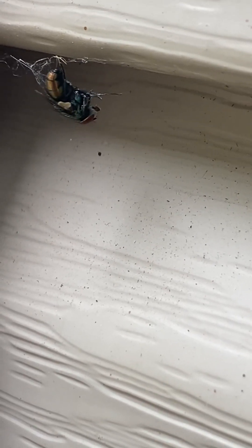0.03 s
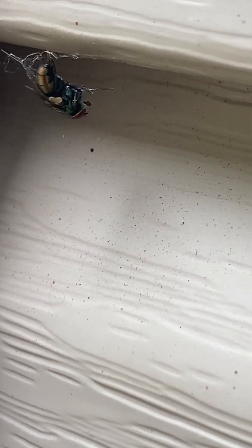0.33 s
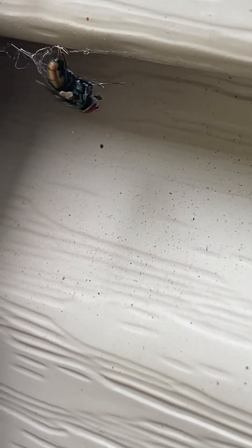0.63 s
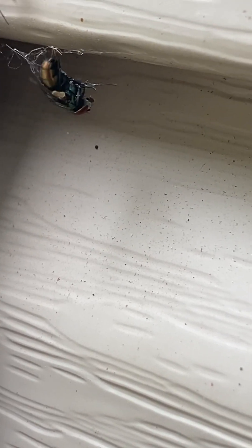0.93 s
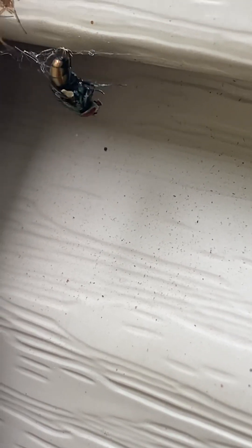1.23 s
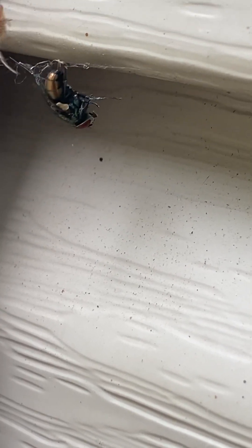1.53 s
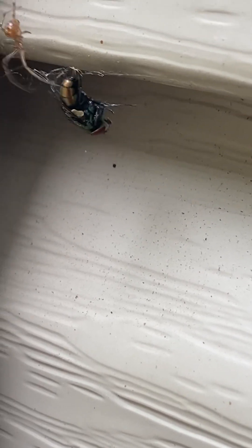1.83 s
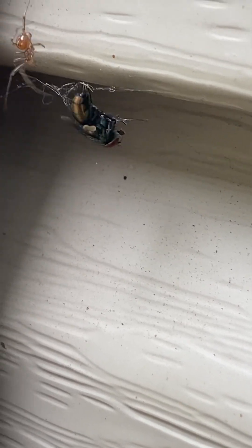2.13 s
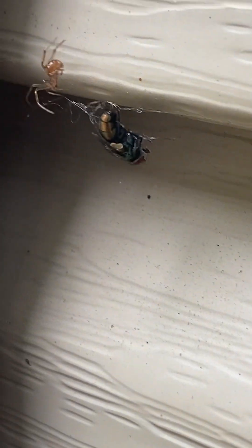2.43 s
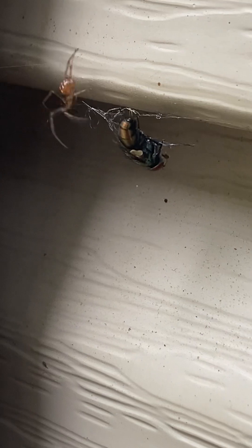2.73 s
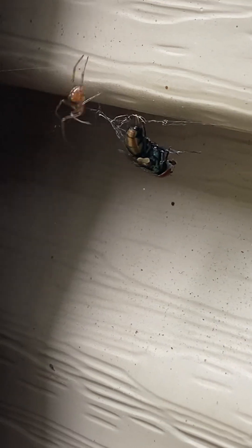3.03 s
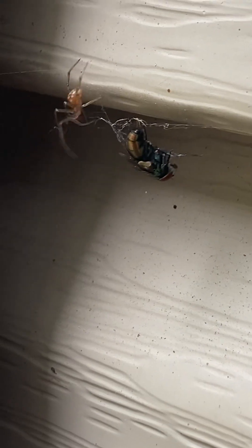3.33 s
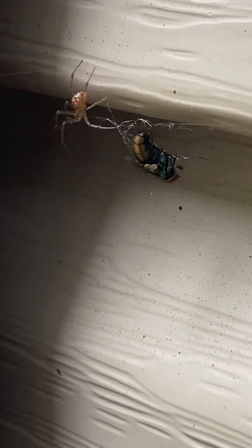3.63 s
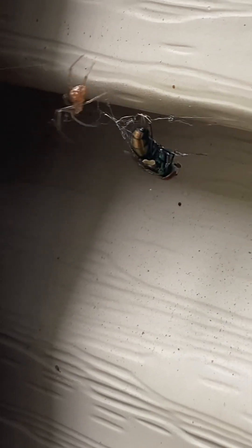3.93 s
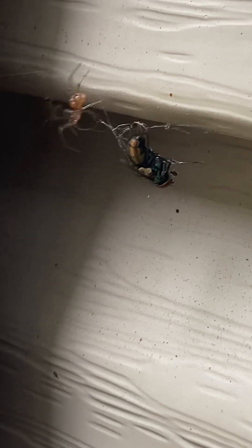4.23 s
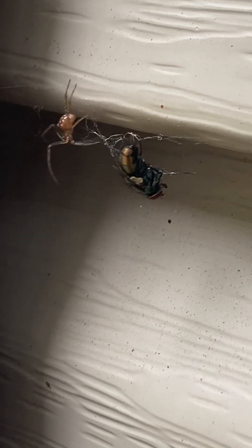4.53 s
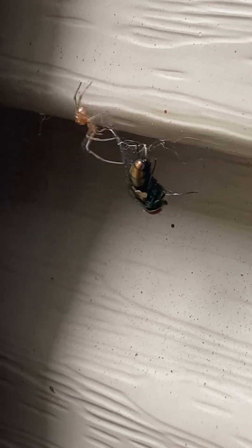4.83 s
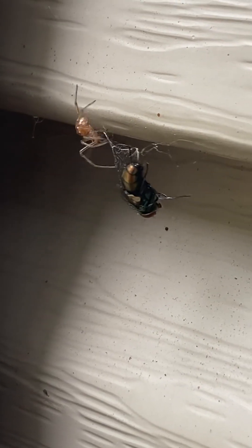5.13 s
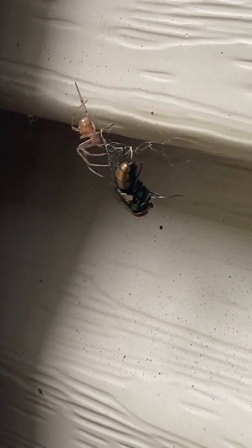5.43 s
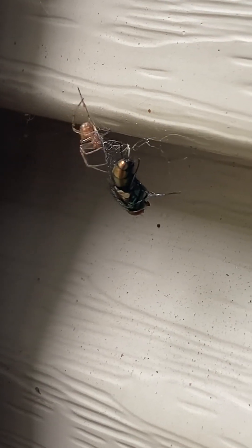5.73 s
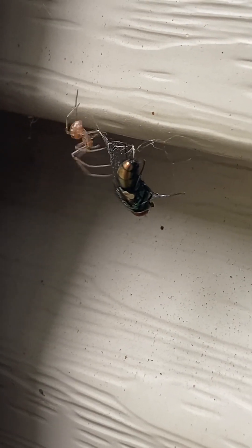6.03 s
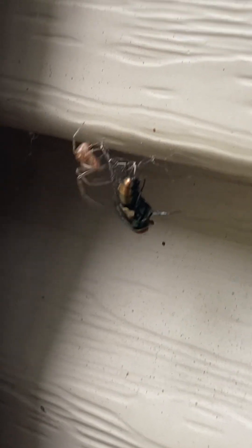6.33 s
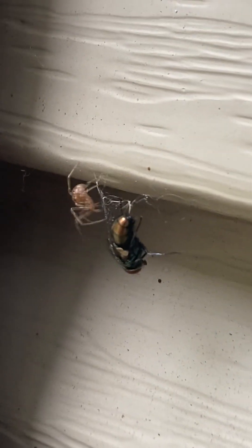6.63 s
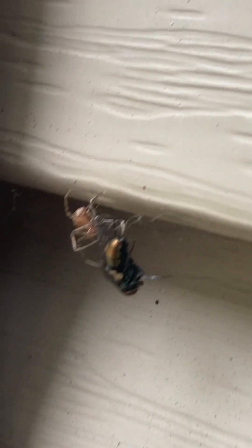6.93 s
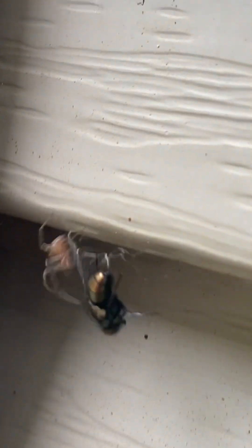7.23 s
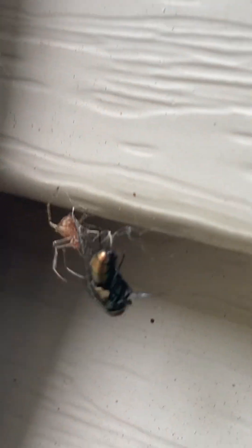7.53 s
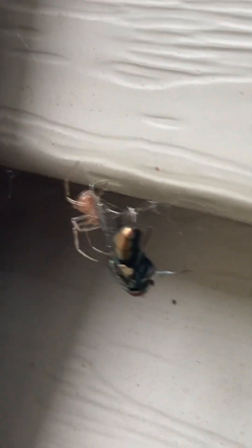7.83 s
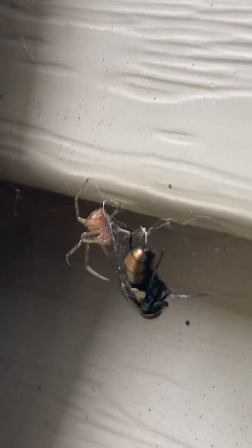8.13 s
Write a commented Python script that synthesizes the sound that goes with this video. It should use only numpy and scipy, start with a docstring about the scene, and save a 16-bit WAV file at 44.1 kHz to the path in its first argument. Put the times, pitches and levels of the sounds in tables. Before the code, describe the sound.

A deep, burbling exhaust and tyre noise swell as a vehicle passes, then fade off throttle, with faint rustling near the end.

```python
"""Eight-cylinder drive-by

A vehicle with a lumpy engine passes a house, heard on two ports of a phone close to the siding.
Its exhaust drones, sinks into a pipe resonance, booms and goes off throttle. Tyres, a high hiss and
brief whines come and go over far traffic. Late on, the hand or sleeve on the phone rustles faintly."""
import sys
import numpy as np
from scipy import signal
from scipy.fft import rfft, irfft
from scipy.io import wavfile
from scipy.ndimage import uniform_filter1d

SR = 44100
rng = np.random.default_rng(int(sys.argv[2]) if len(sys.argv) > 2 else 0)


def file_out(sig):
    """Save sig as 16-bit WAV at sys.argv[1]."""
    # one column per channel
    cols = np.atleast_2d(sig).T
    # limit, then scale
    lim = np.clip(cols, -1, 1)
    pcm = np.round(lim * 32767).astype(np.int16)
    wavfile.write(sys.argv[1], SR, pcm)


N = 365148
T = np.arange(N) / SR
FREQ_HZ = np.maximum(np.arange(N // 2 + 1) * SR / N, 1)

# Noise colours. Each row: frequency in Hz, relative level in dB.
TRAFFIC_COLOUR = [(20, -15.5), (45, 7), (110, 10.5), (250, 1), (450, -29), (600, -32.5), (850, -32.5),
                  (1600, -34), (2500, -19), (4000, -45.5), (8000, -42), (15000, -56.5)]
CLOTH_COLOUR = [(1500, -10), (3800, 5), (6000, 2), (8000, -2), (10500, 1), (14000, -3), (16000, -8)]
TREAD_COLOUR = [(350, -3.5), (520, -12.5), (700, -9), (960, -9), (1130, -3.5), (1600, -3), (2120, -4.5),
                (2280, -7.5), (2450, -5), (3000, -8), (3500, -10), (4300, -12.5), (5800, -19), (12000, -54)]
FIRING_COLOUR = [(20, -40.5), (40, -7.5), (60, -5), (110, 3.5), (170, -3), (260, -1.1), (380, 0), (470, 4),
                 (560, -14.5), (700, -11), (900, -33), (2500, -100)]
# High hiss. Each row: frequency in Hz, relative level in dB.
HIGH_HISS_COLOUR = [(2500, -17), (4200, -13.5), (5400, 1), (7000, -1), (10000, 0), (11500, -16),
                    (14000, -12.5), (15500, -19)]
# Slides of hand or sleeve. Each row: centre in seconds, half length in seconds, level in dB.
RUSTLES = [(6.68, .07, -66), (6.76, .05, -69), (6.843, .02, -66), (6.92, .09, -70.5), (7.055, .06, -70.5),
           (7.16, .07, -70), (7.235, .025, -68.5), (7.285, .035, -69), (7.4, .7, -76), (7.51, .065, -70),
           (7.625, .055, -70.5), (7.81, .05, -73), (7.99, .035, -69), (8.085, .035, -70.5)]
# Whines and swells of pitched noise.
# Each row: centre and half length in seconds, pitch and half width in Hz, level in dB.
PITCHED_SWELLS = [(.75, .3, 580, 32, -57), (2.75, .62, 1380, 20, -54), (2.72, .13, 1440, 110, -49),
                  (2.85, .45, 1850, 360, -51), (3.17, .13, 1775, 45, -53), (3.1, 1.1, 616, 24, -57),
                  (3.17, .09, 1440, 130, -50.5), (3.45, .17, 1520, 38, -55), (3.45, .3, 1210, 45, -55),
                  (3.55, .65, 1120, 40, -54), (4.003, .58, 426, 15, -47), (4.16, .58, 2400, 890, -52.5),
                  (4.1, .25, 2130, 60, -58), (4.25, .04, 1765, 50, -51), (4.6, .35, 1900, 230, -53.5),
                  (4.8, .4, 1760, 50, -54), (4.5, .5, 1470, 70, -56), (4.35, .25, 705, 45, -54),
                  (4.93, .2, 815, 75, -49), (5.1, .25, 1105, 34, -56), (5.286, .13, 1590, 348, -52),
                  (5.6, .35, 518, 38, -57.5), (6.814, 1, 856, 150, -65)]
# Engine speed. Each row: time in seconds, firing rate of one cylinder bank in Hz.
BANK_RATE = [(0, 80.94), (.5, 84.8), (.72, 89.5), (1.05, 82), (1.22, 74.7), (2.8, 74.7), (3.6, 74.9),
             (4.5, 74.2), (4.85, 73), (5.32, 71.6), (5.7, 60.5), (6.12, 54.8), (6.76, 58.5), (7.15, 58.6),
             (7.52, 59.2), (7.7, 47), (8.28, 42)]
# Rough exhaust. Each row: time in seconds, relative burble and rasp levels in dB.
ROUGH_LEVELS = [(0, -50.5, -54), (.9, -45.5, -51), (1.6, -49, -52.5), (2.2, -48, -50.5),
                (2.8, -43.5, -48.5), (3.55, -43.5, -44.5), (4.1, -42, -42), (5.22, -50, -43),
                (5.5, -43, -46.5), (6.05, -45, -50), (6.5, -41.5, -53), (7.1, -48.5, -55.5),
                (7.5, -49, -58), (7.7, -53, -63.5), (8.28, -88, -58)]
# Band cancelled by the road reflection. Each row: time in seconds, frequency in Hz.
ROAD_NOTCH = [(0, 392), (2.45, 452), (3.4, 482), (4.4, 565), (5.2, 690), (8.28, 652)]
# Overtone swells. Each row: centre and half length in seconds, multiple of the bank rate, level in dB.
OVERTONES = [(2.9, .4, 1.5, -46), (3.85, .22, 1.5, -41.5), (4.65, .35, 1.5, -40.5), (5.35, .06, 2.5, -46),
             (6.4, .11, 2.5, -45), (7.77, .12, 2.5, -47), (.6, .6, 3, -52), (3, 1.9, 3, -47.5),
             (1.6, .3, 3, -49), (2.15, .16, 3, -44.5), (2.6, .12, 3, -45), (3.15, .2, 3, -43),
             (3.68, .16, 3, -39.5), (4.25, .2, 3, -43.5), (4.85, .25, 3, -44.5), (5.65, .09, 3, -44),
             (7.2, .32, 3, -42), (3.7, 1.5, 4, -46.5), (1.65, .15, 4, -49), (2.32, .2, 4, -44.5),
             (2.87, .11, 4, -39), (3.3, .14, 4, -43), (3.67, .09, 4, -40.5), (4.27, .25, 4, -41.5),
             (4.92, .36, 4, -43.5), (6.78, .3, 4, -47.5), (7.35, .13, 4, -51), (2.8, 1.1, 4.5, -49),
             (1.33, .08, 4.5, -51), (2, .13, 4.5, -46), (2.53, .14, 4.5, -44), (3, .25, 4.5, -46),
             (4.1, .2, 4.5, -46), (5.42, .12, 4.5, -52), (4.3, 1, 5, -47.5), (1.5, .2, 5, -57),
             (3.05, .09, 5, -48), (3.5, .23, 5, -46.5), (4, .2, 5, -48), (4.65, .12, 5, -42),
             (4.98, .13, 5, -44), (5.24, .08, 5, -44), (6, .12, 6, -54), (6.42, .2, 6, -50.5),
             (7.3, .3, 6, -57)]
# Drone, dying as the throttle closes. Each row: time in seconds, base level in dB.
DRONE_LEVEL = [(0, -38.5), (.35, -33.5), (1.2, -39), (2.3, -34), (2.8, -33), (3.2, -35.5), (4.2, -30),
               (5.1, -26.5), (5.8, -32), (6.27, -35.5), (6.5, -38), (7.0, -35), (7.51, -42), (7.6, -51.5),
               (8.28, -50)]
# Drone dips. Each row: centre and half length in seconds, multiple of the bank rate, gain in dB.
DRONE_DIPS = [(0.627, 0.081, 1, -20), (0.93, 0.038, 1, -8), (1.115, 0.041, 1, 1), (1.634, 0.066, 1, -7),
              (2.018, 0.062, 1, -12), (2.497, 0.085, 1, -10), (2.97, 0.091, 1, -11), (3.322, 0.056, 1, -8),
              (4.595, 0.16, 1, -13), (5.436, 0.1, 1, -10), (0.406, 0.2, 2, -4), (2.53, 0.064, 2, -19.5),
              (3.496, 0.16, 2, -10.5), (4, 0.15, 2, -12), (5.846, 0.36, 2, -14), (7.115, 0.28, 2, -22),
              (7.604, 0.059, 2, -21), (8.252, 0.15, 2, -8)]
# Main exhaust resonance. Each row: centre in Hz, half width in Hz, gain in dB.
PIPE_RESONANCE = [(114.34, 33.9, 32)]
# Microphone pair. Each row: frequency in Hz, likeness 0-1, left lead in radians, left minus right in dB.
PORTS = [(60, 1, 0, 4.8), (280, .998, -.12, 5), (450, .95, -.3, 6), (700, .72, -1.1, 4),
         (1030, .7, -1.1, 1.5), (1400, .75, -.45, .3), (1800, .92, 0, 0), (2600, .65, .7, 0),
         (3500, .45, 2.2, 0), (4400, .3, 2.6, 0), (5600, .8, 3.4, 0), (7000, .85, 4.8, 0),
         (8300, .9, 6.2, 0), (10200, .85, 7.7, 0), (15000, .85, 12.5, 0)]
# Pass-by laws. Each row: level in dB, approach rise and leaving fall in dB/s, line-of-sight gain in dB.
ROAR_PASS = (-49.5, 1.2, 4, 3.5)
SING_PASS = (-50.5, 1.52, 6, -1.5)
RUSH_PASS = (-60, 1.5, 4.5, 3.5)
HISS_PASS = (-67, 6, 9.5, 6)

APPEARS_S, HIDES_S, EDGE_S = 2.47, 5.22, 0.14  # line of sight


def undb(db):
    """Decibels to gain."""
    return 10 ** (np.asarray(db) / 20)


def unit(x):
    """Scale to rms 1."""
    return x / np.sqrt(np.mean(x ** 2))


def steady(x):
    """Hold rms at 1 over half a second."""
    return x / np.sqrt(uniform_filter1d(x ** 2, SR // 2) + 1e-12)


def over_time(table):
    """Columns of a time table, per sample."""
    s, *columns = np.transpose(table)
    return [np.interp(T, s, c) for c in columns]


def over_hz(table):
    """Columns of a frequency table, per bin."""
    hz, *columns = np.transpose(table)
    return [np.interp(np.log(FREQ_HZ), np.log(hz), c) for c in columns]


def colour(table):
    """Gain per bin of a colour table."""
    return undb(over_hz(table)[0])


def filtered(x, gain):
    """Apply a gain per bin."""
    return irfft(rfft(x) * gain, N)


def shape(x, gain):
    """Filter, then scale to rms 1."""
    return unit(filtered(x, gain))


def below(hz, order=6):
    """Low-pass gain."""
    return 1 / np.sqrt(1 + (FREQ_HZ / hz) ** (2 * order))


def above(hz, order=6):
    """High-pass gain."""
    return np.sqrt(1 - below(hz, order) ** 2)


def resonance(hz, half_width_hz):
    """Gain of a resonant peak."""
    return 1 / (1 + ((FREQ_HZ - hz) / half_width_hz) ** 2)


def noise(gain):
    """Two noises of one colour: one for both ports, one for the right only."""
    return shape(rng.standard_normal((2, N)), gain)


def walk(hz):
    """Smooth random wander, rms 1."""
    return shape(rng.standard_normal(N), below(hz, order=3))


def swell(centre_s, half_s):
    """Bell curve in time, peak 1."""
    return np.exp(-((T - centre_s) / half_s) ** 2)


def tone(cycles):
    """Sine of rms 1, random start phase."""
    return np.sqrt(2) * np.sin(2 * np.pi * (cycles + rng.random()))


def past(s):
    """Smooth 0-to-1 step as the vehicle passes an edge."""
    return (1 + np.tanh((T - s) / EDGE_S / 2)) / 2


def passing_db(db, rise_db_per_s, fall_db_per_s, sight_db):
    """Level of a source that nears, comes into sight, hides and recedes."""
    approach_db = rise_db_per_s * np.maximum(APPEARS_S - T, 0)
    leaving_db = fall_db_per_s * np.maximum(T - HIDES_S, 0)
    return db - approach_db - leaving_db + sight_db * (past(APPEARS_S) - past(HIDES_S))


def far_traffic(level_db=-50):
    """Distant rumble, gently heaving."""
    return noise(colour(TRAFFIC_COLOUR)) * undb(level_db + 0.23 * walk(0.86))


def handling(grain_db=1.4, tick_s=6.709, decay_s=.003, case_hz=3900, half_width_hz=800):
    """Grainy slides of skin or cloth; a tick and a scrape ring dully in the phone's case."""
    rubbing = np.sqrt(sum((undb(db) * swell(s, half_s)) ** 2 for s, half_s, db in RUSTLES))
    grain = undb(grain_db * walk(70))
    rustle = noise(colour(CLOTH_COLOUR)) * rubbing * grain
    tick = undb(-48) * (T >= tick_s) * np.exp(-np.abs(T - tick_s) / decay_s)
    scrape = undb(-68) * swell(6.848, half_s=.022)
    ring = noise(resonance(case_hz, half_width_hz)) * (tick + scrape)
    return rustle + filtered(ring, below(case_hz + half_width_hz))


def wall_echoes(x, depth_db, change_s=.7, size=2048):
    """Fine spectral peaks and dips from the walls, shifting as the vehicle moves."""
    spectra = signal.stft(x, nperseg=size)[2]
    frames = int(change_s * SR / (size / 2))
    ripple = uniform_filter1d(rng.standard_normal(spectra.shape[1:]), size=3, axis=0)
    ripple = unit(uniform_filter1d(ripple, frames, axis=1))
    return unit(signal.istft(spectra * undb(depth_db * ripple))[1][:, :N])


def high_hiss(ripple_db=1.25, flutter_db=.94):
    """High hiss; swells and fades with the pass."""
    hiss = wall_echoes(noise(colour(HIGH_HISS_COLOUR)), ripple_db)
    return hiss * undb(passing_db(*HISS_PASS) + flutter_db * walk(20))


def tyres(ripple_db=2.5, flutter_db=1, surge_db=1.13):
    """Tread noise in three bands; each swells and fades at its own rate."""
    bands = [(below(994), ROAR_PASS), (above(840) * below(2240), SING_PASS), (above(2450), RUSH_PASS)]
    tread = 0
    for band, law in bands:
        rolling = wall_echoes(noise(colour(TREAD_COLOUR) * band), ripple_db)
        tread += rolling * undb(passing_db(*law) + flutter_db * walk(24) + surge_db * walk(9.7))
    return tread


def crank(waver_share=.004, waver_s=.04, stumble_cycles=.012):
    """Running count of one bank's firings; unsteady as speed changes and as the engine labours."""
    rate_hz = over_time(BANK_RATE)[0]
    change_per_s = np.abs(np.gradient(np.log(rate_hz))) * SR
    unsteady = 1 + (waver_share + waver_s * np.minimum(change_per_s, .5)) * walk(20)
    stumble = stumble_cycles * swell(5.4, half_s=.7) * walk(35)
    return np.cumsum(rate_hz * unsteady) / SR + stumble


def clatter(cycles, fade_hz=3.33):
    """Four rough patterns, repeating every second bank firing, each fading in and out."""
    patterns = rng.standard_normal((4, 1024))
    place = np.linspace(0, 1, patterns.shape[1])
    return unit(sum(np.interp(cycles / 2 % 1, place, pattern) * walk(fade_hz) for pattern in patterns))


def engine_whine(rattle, trim_db=-3):
    """Fine lines of clatter, heard while the engine bay faces the phone."""
    facing = swell(3.6, half_s=1.8)
    return shape(rattle, above(600) * below(2900)) * facing * undb(passing_db(*SING_PASS) + trim_db)


def pitched_swells(rattle, flicker_db=1.6, waver=.004):
    """Brief whines and broad swells of pitched noise in the pass; a soft midrange wash as it recedes."""
    drive = rattle / 2 + rng.standard_normal((2, N))
    ringing = 0
    for s, half_s, hz, half_width_hz, db in PITCHED_SWELLS:
        envelope = swell(s, half_s) * undb(db + flicker_db * walk(5.1))
        ringing += shape(drive, resonance(hz, half_width_hz)) * envelope
    warped_s = T + waver * np.cumsum(walk(5) - walk(5)) / SR  # pitch wavers
    return np.array([np.interp(warped_s, T, channel) for channel in ringing])


def rough_exhaust(cycles, road_gain=.86, hollow_hz=282, burble_trim_db=2.8, rasp_trim_db=-2.5):
    """Unequal firings of both banks: low burble, and rasp that opens as the tailpipe comes round."""
    fired = np.flatnonzero(np.diff(np.floor(2 * cycles)))
    pulses = np.zeros(N)
    pulses[fired] = rng.uniform(-0.99, 1, len(fired))
    rough = shape(unit(pulses) + rng.standard_normal(N), colour(FIRING_COLOUR))
    road_delay_s = .5 / over_time(ROAD_NOTCH)[0]
    rough += road_gain * np.interp(T - road_delay_s, T, rough)
    # low mids hollow out once the vehicle is hidden
    rough -= .98 * past(HIDES_S) * filtered(rough, resonance(hollow_hz, half_width_hz=64))
    burble_db, rasp_db = over_time(ROUGH_LEVELS)
    burble = steady(shape(rough, below(272, order=8))) * undb(burble_db + burble_trim_db)
    rasp = steady(shape(rough, above(280, order=8))) * undb(rasp_db + rasp_trim_db)
    return burble + rasp


def pipe_overtones(cycles, sway_db=1):
    """Higher exhaust tones swell in turn; unequal cylinders give the half multiples."""
    out = 0
    for multiple in sorted({row[2] for row in OVERTONES}):
        power = sum((undb(db) * swell(s, half_s)) ** 2 for s, half_s, k, db in OVERTONES if k == multiple)
        out += np.sqrt(power) * undb(sway_db * walk(4.4)) * tone(multiple * cycles)
    return out


def drone_tone(cycles, multiple, level_db, throb_db):
    """One low exhaust tone; it throbs and dips briefly."""
    dip_db = sum(db * swell(s, half_s) for s, half_s, k, db in DRONE_DIPS if k == multiple)
    throb = unit(walk(16) + .5 * walk(37))
    return undb(level_db + dip_db + throb_db * throb) * tone(multiple * cycles)


def pipe_drone(cycles, second_db=-17, throb_db=1.6, boom_throb_db=.6, thump_hz=57):
    """Two lowest exhaust tones; the second booms in the pipe resonance. A thump leads the rev break."""
    second_hz = 2 * over_time(BANK_RATE)[0]
    level_db = over_time(DRONE_LEVEL)[0]
    boom_db = sum(db * np.exp(-((second_hz - hz) / half_hz) ** 2) for hz, half_hz, db in PIPE_RESONANCE)
    rev_break = swell(.95, half_s=.3)
    first = drone_tone(cycles, 1, level_db, throb_db + 1.7 * rev_break)
    # resonance steadies the second tone
    held_throb_db = np.interp(boom_db / boom_db.max(), [.25, .5], [throb_db, boom_throb_db])
    second = drone_tone(cycles, 2, level_db + second_db + boom_db, held_throb_db)
    thump = undb(-42) * swell(.62, half_s=.065) * tone(thump_hz * T)
    return first + second + thump


def ports(shared, right_only):
    """The right port hears the sound phase-shifted, with less bass, partly from other directions."""
    likeness, lead_rad, balance_db = over_hz(PORTS)
    left = rfft(shared)
    right = (likeness * left + np.sqrt(1 - likeness ** 2) * rfft(right_only)) * np.exp(-1j * lead_rad)
    left_share = 1 / (1 + undb(-balance_db))
    return irfft(2 * np.array([left_share * left, (1 - left_share) * right]), N)


def scene():
    """Vehicle, far traffic and hand at the two ports."""
    cycles = crank()
    rush = tyres() + high_hiss()
    rattle = np.array([clatter(cycles), clatter(cycles)])
    shared, right_only = rush + engine_whine(rattle) + pitched_swells(rattle) + far_traffic() + handling()
    exhaust = rough_exhaust(cycles) + pipe_drone(cycles) + pipe_overtones(cycles)
    return ports(shared + exhaust, right_only)


def record(dry, bass_hz=35, top_hz=15400):
    """The phone cuts the deepest bass and the top."""
    lean = filtered(dry, above(bass_hz, order=4))
    return signal.sosfilt(signal.ellip(12, .2, 80, top_hz, fs=SR, output="sos"), lean)


dry = scene()
out = record(dry)
file_out(out)
```